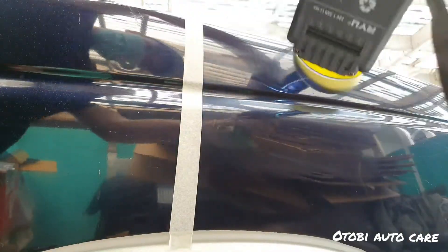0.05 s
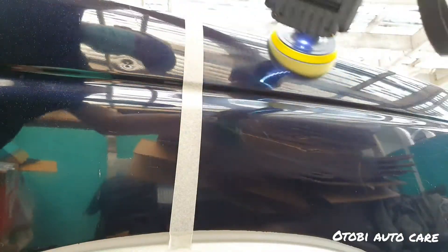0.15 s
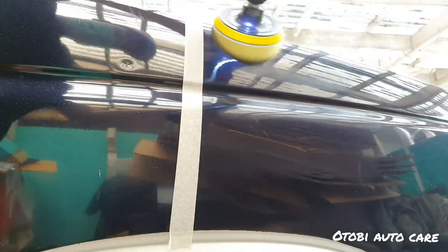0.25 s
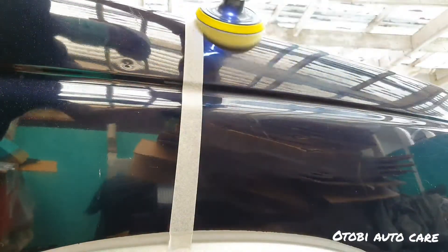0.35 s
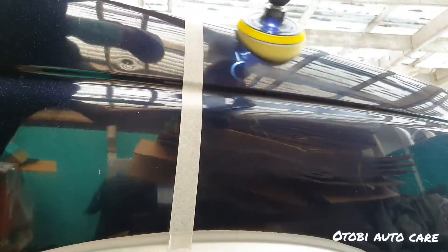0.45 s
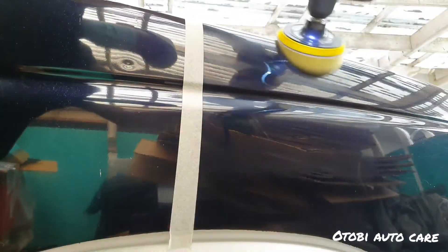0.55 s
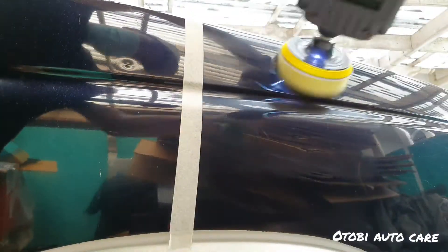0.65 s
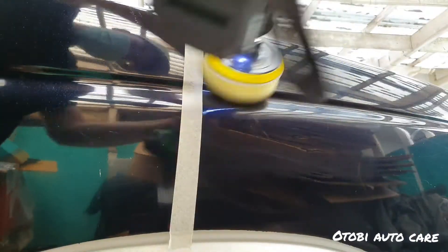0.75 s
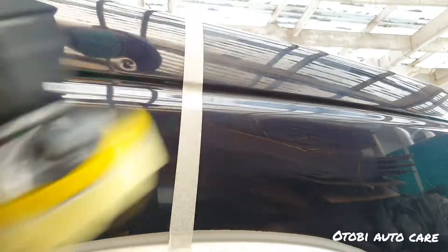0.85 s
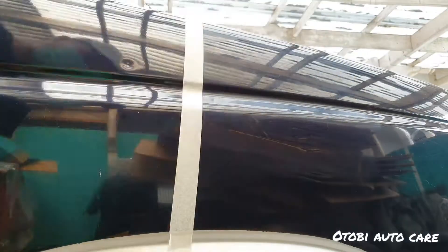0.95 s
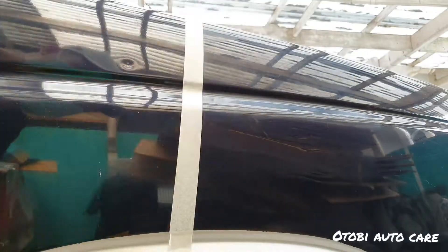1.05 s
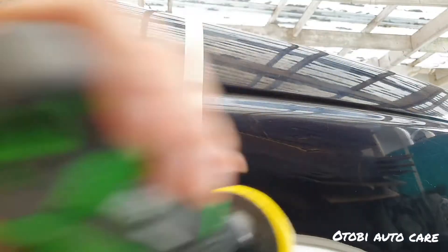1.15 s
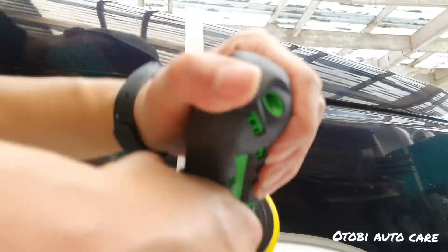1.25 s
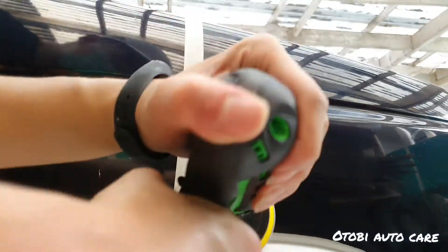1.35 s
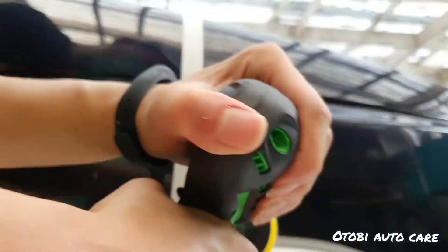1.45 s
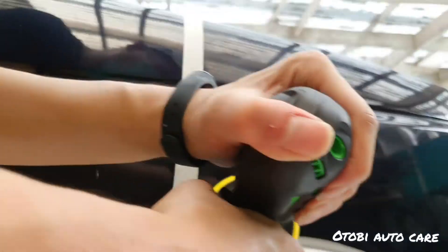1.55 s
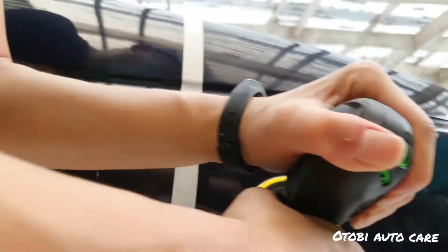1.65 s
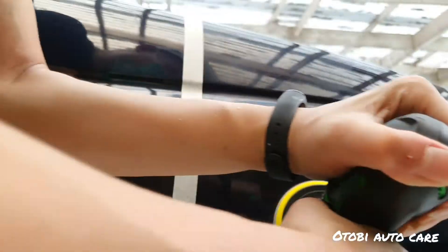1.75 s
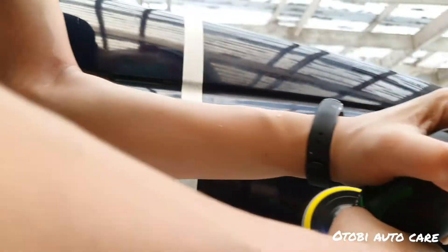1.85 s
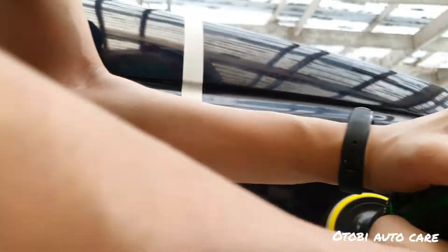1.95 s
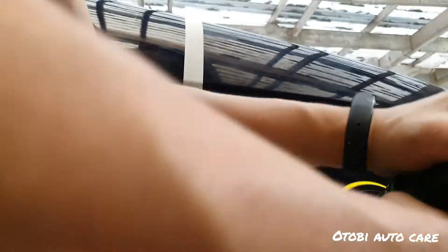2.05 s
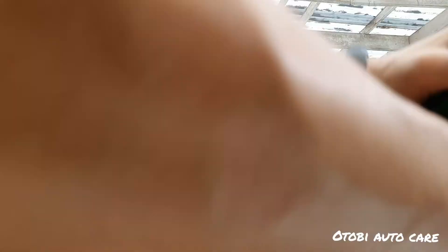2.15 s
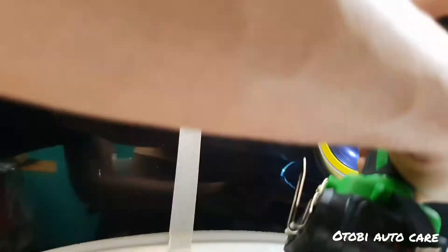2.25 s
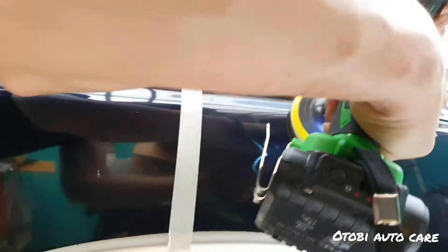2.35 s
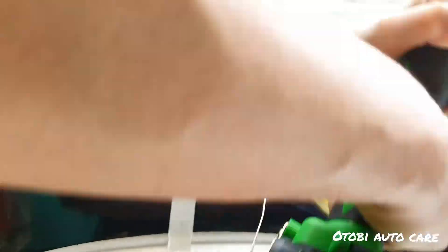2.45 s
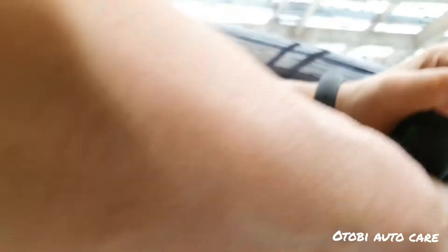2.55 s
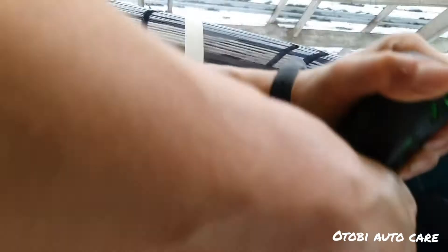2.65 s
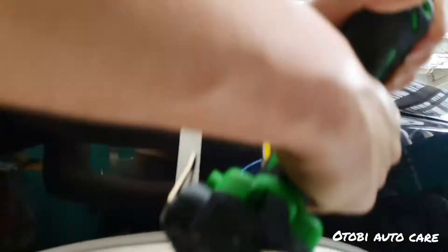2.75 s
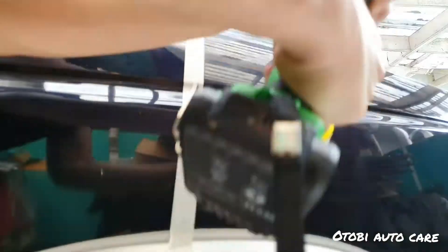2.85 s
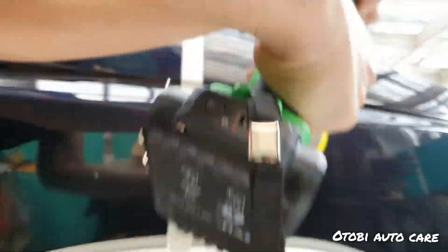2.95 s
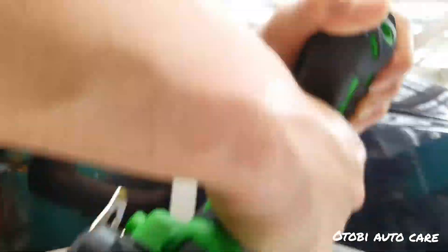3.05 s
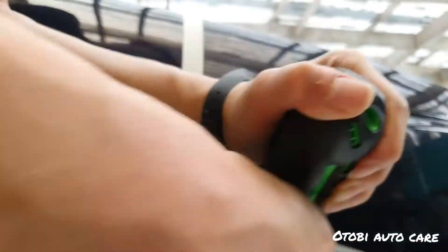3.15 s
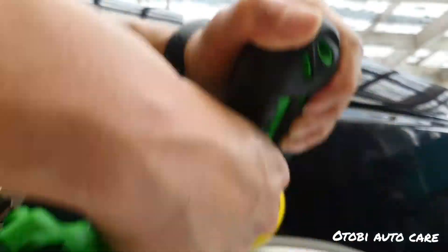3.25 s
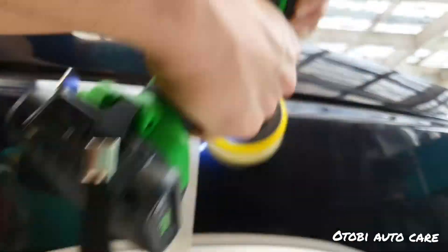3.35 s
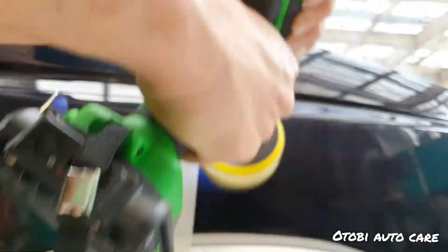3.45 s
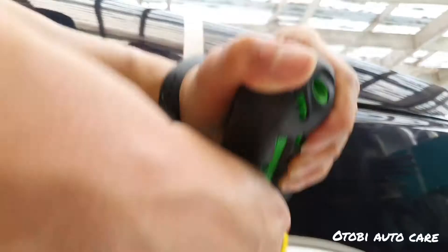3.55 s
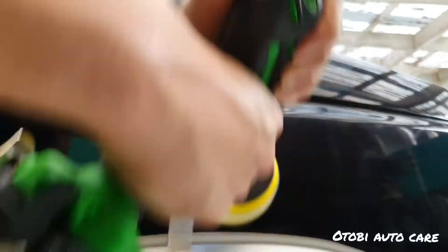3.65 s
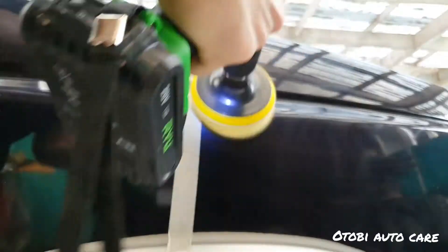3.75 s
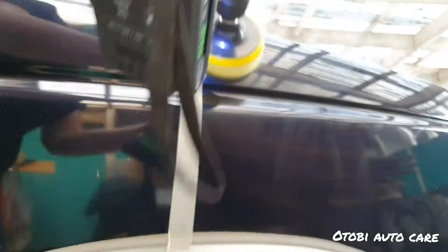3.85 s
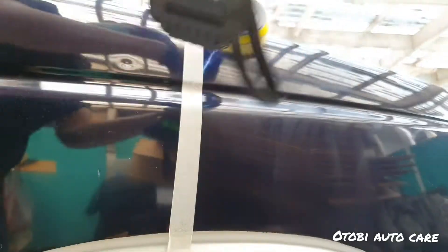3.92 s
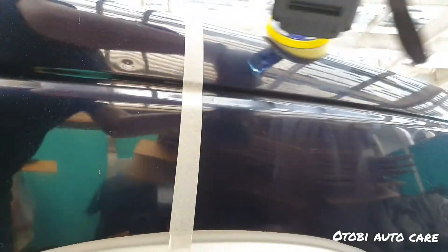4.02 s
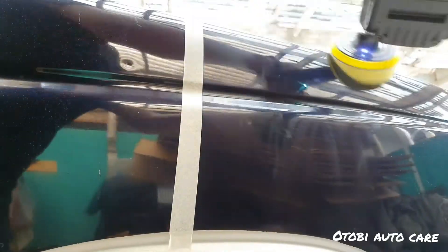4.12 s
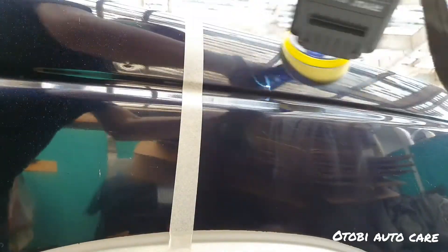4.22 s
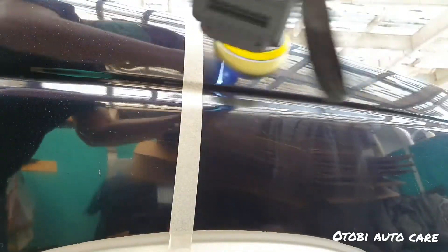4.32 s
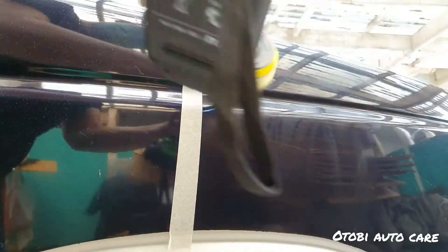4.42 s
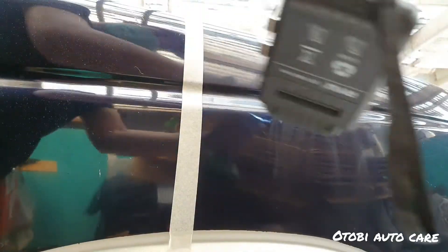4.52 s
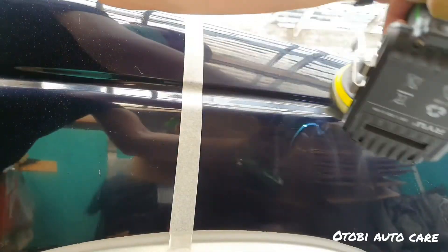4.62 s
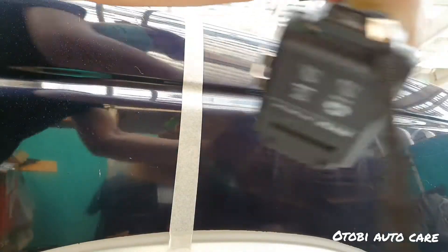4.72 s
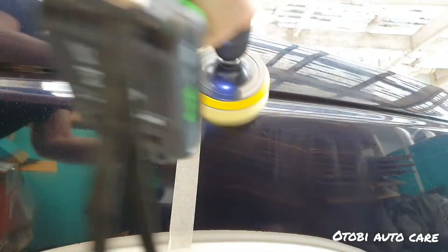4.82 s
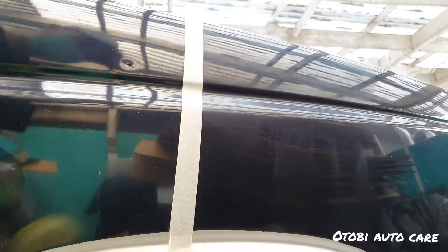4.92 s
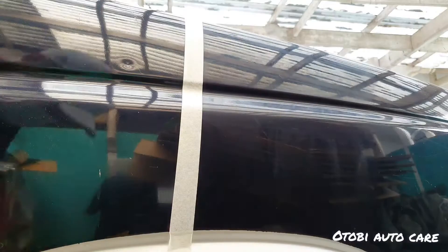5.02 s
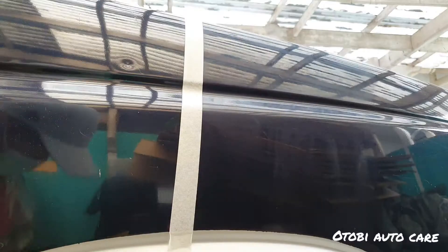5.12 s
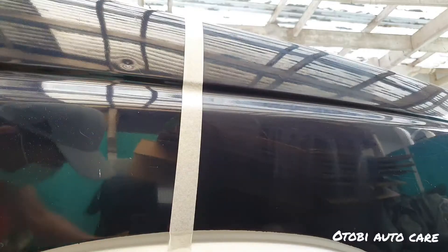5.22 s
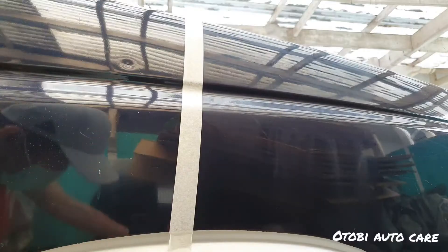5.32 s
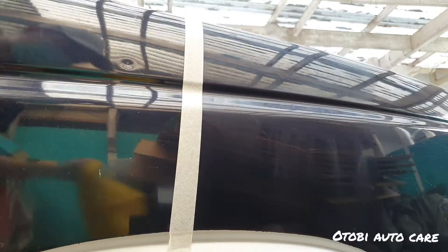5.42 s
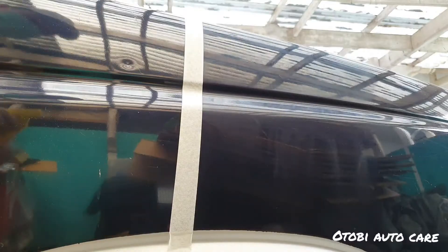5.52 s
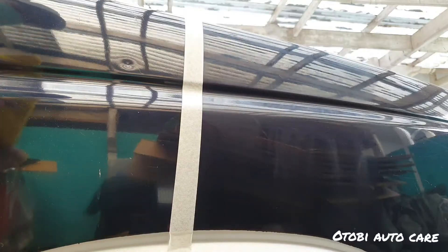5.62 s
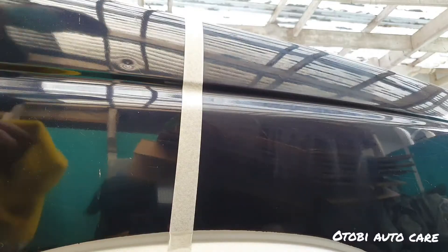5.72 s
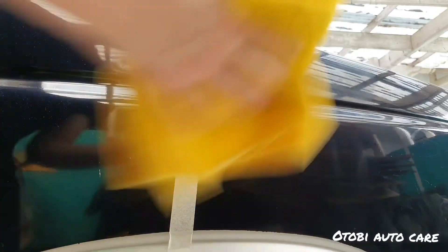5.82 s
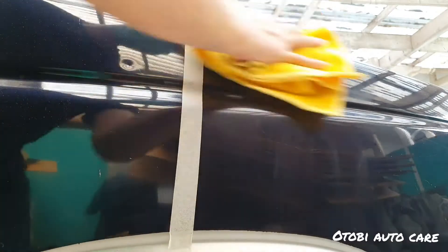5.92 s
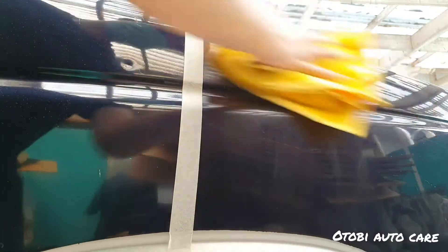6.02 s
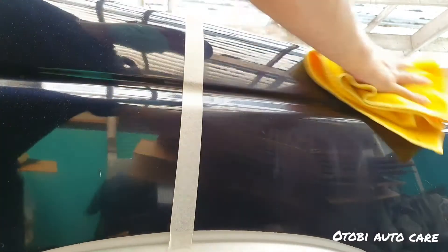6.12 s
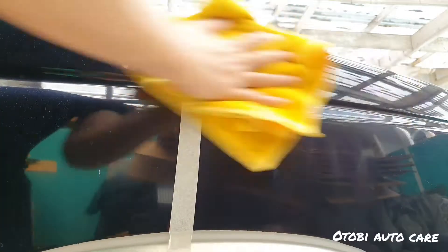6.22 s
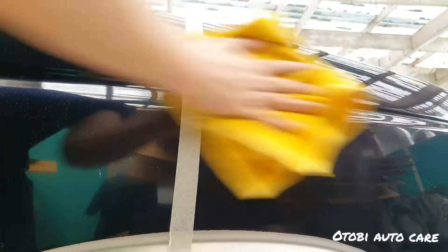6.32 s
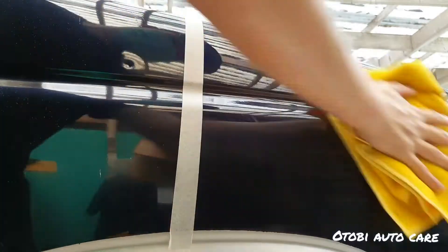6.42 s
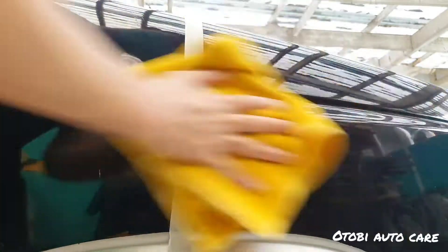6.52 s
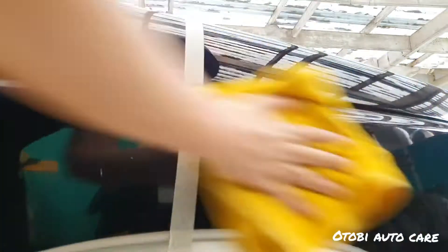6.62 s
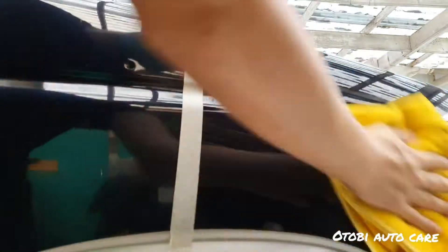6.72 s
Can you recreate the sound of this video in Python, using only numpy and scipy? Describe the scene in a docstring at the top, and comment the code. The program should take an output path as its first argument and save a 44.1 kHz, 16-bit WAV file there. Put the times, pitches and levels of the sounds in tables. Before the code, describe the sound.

From 0 s a cordless drill is already spinning close to the microphone: a piercing gear whine around 2.6 kHz, low motor hum and dry rattling teeth, slightly wavering. It stumbles near 0.6 s and stops abruptly at about 0.77 s. The gap holds low rumble and a faint rub. At 1.2 s a click and panel bump bring it back, with overlapping short squeals and chirps until 1.5 s. From 1.5 to 3.8 s pressure makes it raspier, hissing and hoarse, pitch sagging and recovering, while the car panel booms and judders softly. It runs freer and lighter from 3.9 s, stumbles near 4.4 s, and halts at 4.8 s with a sharp knock. Another hard tap comes at 5.2 s. Until 6.8 s, faint brief cloth strokes, small squeaks and ticks sit over low rumble and thin workshop air, nearly without echo.

```python
"""Drill-driven foam pad on a car panel

A cordless drill, already running, spins the pad in a workshop: one short run, a pause, then a long one.
Rotor orders hum; planetary gear teeth whine and rattle, with short squeals and gliding tones.
Load raises the rasp; the panel drums as noise and booms when bumped. Then a knock puts the drill aside,
and cloth noise wipes the paint over a low rumble and faint air."""
import sys
import numpy as np
from scipy import signal
from scipy.fft import rfft, irfft, next_fast_len
from scipy.io import wavfile

SR = 44100
rng = np.random.default_rng(int(sys.argv[2]) if len(sys.argv) > 2 else 0)


def materialize(psi):
    """Save the field psi as 16-bit PCM at rate SR to the path in sys.argv[1].

    A 1-D psi becomes a single channel; in a 2-D psi each row is a channel.
    """
    bounded = np.clip(np.atleast_2d(psi).T, -1, 1)
    quanta = np.round(bounded * 32767).astype(np.int16)
    wavfile.write(sys.argv[1], SR, quanta)


N = 298557
TIME = np.arange(N) / SR

# Low rumble. Each row: time in seconds, level in dB before trim.
RUMBLE_DB = [(0, -55.5), (.83, -53), (.95, -42), (1.25, -52), (4.8, -49), (5.15, -41), (5.55, -43),
             (5.9, -48.5), (6.77, -48.5)]
# Its spectrum. Each row: frequency in Hz, relative density in dB.
RUMBLE_COLOUR_DB = [(22, -13), (32, -4.5), (42, 1.5), (55, -11.5), (72, -0.5)]
# Workshop air spectrum. Each row: frequency in Hz, relative density in dB.
AIR_COLOUR_DB = [(200, -25), (280, -16), (400, -13.5), (650, -19), (780, -27), (2040, -30.5), (5000, -43.5),
                 (7600, -41.5), (8400, -49), (15800, -46.5)]
# Faint workshop tone. Each row: frequency in Hz, level in dB.
ROOM_TONES = [(646, -71.5)]
# Panel drumming between bumps. Each row: time in seconds, level in dB before trim.
PANEL_DB = [(0, -49), (.5, -47), (1.1, -38), (1.55, -50.5), (2, -37.5), (3, -42), (3.65, -47), (3.85, -40),
            (4.8, -54.5), (5.3, -51.5), (6.77, -52)]
# Its spectrum. Each row: frequency in Hz, relative density in dB.
PANEL_COLOUR_DB = [(70, -2.5), (95, -3.5), (125, -1), (175, -2), (225, -4)]
# Bumps on the door panel. Each row: time in seconds, level in dB.
BUMPS = [(1.165, -30.5), (1.27, -40.5), (1.34, -38.5), (2.05, -38), (2.13, -36), (2.3, -34), (2.47, -34),
         (2.849, -36.5), (3.17, -39.5), (3.35, -36.5), (3.48, -38.5), (3.714, -30.5), (4.02, -38),
         (4.62, -37.5), (4.78, -38)]
# Judders as the foam grips. Each row: middle in seconds, half length in seconds, level in dB, pitch in Hz.
JUDDERS = [(1.72, 0.15, -38.5, 67.5), (1.97, 0.14, -34.5, 57), (2.535, 0.059, -33, 53.3),
           (3.094, 0.1, -37.5, 53), (3.58, 0.043, -35.5, 60)]
# Cloth strokes. Each row: middle in seconds, half length in seconds, level in dB, brightness in dB.
WIPES = [(1.059, 0.013, -59.5, 2), (4.92, 0.025, -66, -2.5), (5.062, 0.013, -63, 3),
         (5.288, 0.01, -53.5, 3), (5.341, 0.015, -56.5, 18), (5.453, 0.01, -54.5, 0),
         (5.53, 0.039, -63.5, -1), (5.712, 0.021, -64, 2), (5.806, 0.0075, -59.5, 1),
         (5.875, 0.0077, -65, 6), (6.02, 0.018, -65, -7), (6.17, 0.027, -67, -2), (6.331, 0.013, -62, -4),
         (6.475, 0.029, -64.5, 0), (6.55, 0.011, -69, 19), (6.611, 0.014, -55, 2)]
# Cloth on paint. Each row: frequency in Hz, relative density in dB.
CLOTH_COLOUR_DB = [(300, 7), (900, -1), (2000, -3), (3500, -10), (6000, -11), (9000, -19.5), (12500, -14),
                   (15500, -21)]
# Squeaks of rubbed paint. Each row: middle in seconds, half length in seconds, level in dB,
# pitch in Hz, width in Hz.
SQUEAKS = [(5.012, .006, -63, 2700, 250), (5.456, .008, -57, 1930, 260), (5.6, 0.012, -71.5, 7690, 90),
           (5.71, 0.011, -73, 7690, 90), (5.76, 0.014, -70, 7690, 90), (5.947, .004, -62, 2130, 200),
           (6.612, .012, -56, 2100, 500)]
# Knocks and ticks of the handled tool. Each row: time in seconds, level in dB before trim,
# body ring factor 0-1.
KNOCKS = [(1.202, -26.5, 0.05), (4.801, -22.5, 0.22), (4.98, -51.5, 0.8), (5.014, -55, 0.97),
          (5.194, -29.5, 0.92), (5.202, -41, 0.55), (5.207, -47, .4), (5.446, -46, 0.1), (5.944, -62, 0.99),
          (6.714, -44.5, 0.02)]
# Tool body modes. Each row: frequency in Hz, relative level in dB, t60 in seconds.
TOOL_MODES = [(447, 5.5, 0.043), (795, -5, 0.025), (1005, -8, 0.037), (1576, -6, 0.029), (1960, -6, .033),
              (2780, -5, 0.03), (2940, -9, .022), (3370, -8, 0.022), (4450, -15, .025), (5260, -19, 0.025)]
# Trigger. Each row: on in seconds, off in seconds.
RUNS = [(-1.1, .771), (1.2, 4.813)]
# Motor speed before stumbles and jitter. Each row: time in seconds, gear tooth rate in Hz.
TOOTH_RATE_HZ = [(0, 2647), (.08, 2663), (.2, 2604), (.32, 2657), (.49, 2627), (.6, 2617), (.68, 2537),
                 (.775, 2525), (1.22, 2475), (1.55, 2584), (1.65, 2575), (1.75, 2602), (1.92, 2580),
                 (2.08, 2650), (2.25, 2678), (2.38, 2614), (2.54, 2586), (2.87, 2647), (2.98, 2510),
                 (3.22, 2543), (3.36, 2658), (3.46, 2529), (3.56, 2500), (3.72, 2623), (3.81, 2524),
                 (3.87, 2604), (3.99, 2553), (4.2, 2622), (4.35, 2578), (4.41, 2489), (4.55, 2524),
                 (4.8, 2488)]
# Pad pressure on the paint. Each row: time in seconds, load 0-1.
PAD_LOAD = [(0, 0.33), (.37, 0.12), (.65, 0.25), (.76, 0.14), (1.22, 0.17), (1.5, 0.77), (1.83, 0.77),
            (2.07, 0.67), (2.38, 0.53), (2.56, 0.74), (2.84, 0.46), (3.17, 0.72), (3.38, 0.5), (3.55, 0.64),
            (3.92, 0.12), (4.3, 0.15), (4.8, 0.13)]
# Motor stumbles. Each row: middle in seconds, half length in seconds.
STUMBLES = [(0.632, 0.014), (4.382, 0.016)]
# Gear whine. Each row: time in seconds, level in dB before trim and dips.
WHINE_DB = [(0, -24.5), (.04, -25), (.08, -39), (.12, -26), (.21, -24), (.29, -28.5), (.36, -27.5),
            (.49, -23), (.6, -29.5), (.66, -41), (.715, -20.5), (.75, -22.5), (.77, -43.5), (1.22, -50),
            (1.4, -48), (1.44, -35), (1.56, -39), (1.64, -31.5), (1.82, -29), (2.02, -41), (2.21, -30),
            (2.29, -32.5), (2.36, -24.5), (2.45, -33), (2.52, -23), (2.6, -27), (2.68, -25), (2.77, -32),
            (2.98, -28.5), (3.24, -36), (3.33, -31.5), (3.56, -32.5), (3.64, -35), (3.74, -32), (3.82, -34),
            (3.95, -30), (4.13, -26.5), (4.2, -28), (4.27, -29), (4.35, -29), (4.41, -42), (4.45, -40),
            (4.53, -32.5), (4.62, -36), (4.68, -33), (4.72, -42), (4.8, -39)]
# Whine beam as the drill turns. Each row: time in seconds, left-right difference in dB,
# left phase lead in radians.
WHINE_BEAM = [(0, 12, -2.5), (.25, 1, 0.34), (.7, -1, 1.2), (1.35, 1.5, 1.5), (1.6, 2, -1), (1.8, 5.5, 0.5),
              (1.96, -2.5, -9.5), (2.1, 15, -2.5), (2.26, -3, -2.5), (2.36, 13, -2.5), (2.52, 12, -3.5),
              (2.68, 6.5, -1.5), (2.86, 5.5, 1.2), (3.14, 5, -4.5), (3.26, 2.5, 0), (3.42, 5, 1),
              (3.6, 3, 0.2), (3.9, 7, 0.5), (4.16, -2, -2.5), (4.35, 12, 1.5), (4.52, 0, 0), (4.76, 13, -4)]
# Hum orders. Each row: rotor order, left-right difference in dB, phase smear at full load in radians.
HUM_ORDERS = [(1, 3.5, 2.07), (2, -2, .45), (3, -0.5, .5)]
# Hum. Each row: time in seconds, then level of orders 1, 2 and 3 in dB before trim and dips.
HUM_DB = [(0, -42, -43.5, -49), (.35, -44, -44, -49), (.72, -39.5, -46, -48.5), (1.22, -64, -55, -54.5),
          (1.38, -58.5, -59.5, -52), (1.45, -51, -42, -40.5), (1.56, -37, -43, -38),
          (1.7, -45.5, -50, -38.5), (1.9, -47, -49, -40), (2.06, -48, -42, -49.5), (2.2, -46, -51, -56),
          (2.36, -42, -46, -53), (2.56, -42.5, -46, -40.5), (2.68, -47, -38, -44.5),
          (2.88, -39.5, -50, -61), (3.14, -50, -37, -37), (3.34, -40.5, -41.5, -53),
          (3.56, -50, -40.5, -38), (3.76, -44, -42.5, -63), (3.92, -41.5, -50, -48.5),
          (4.1, -40.5, -45, -45), (4.3, -41.5, -43, -49), (4.5, -41.5, -38, -64), (4.8, -42, -40.5, -72)]
# Gear noise spectrum. Each row: frequency in Hz, relative density in dB.
GEAR_COLOUR_DB = [(300, -5.5), (450, -1.5), (640, 0.5), (920, -6), (1080, 3.5), (1600, -2.5), (2300, -3.5),
                  (3150, 0), (3550, -3.5), (4100, -5), (4700, -2), (5600, -6), (6300, -4.5), (6650, -3),
                  (7750, -3), (9000, -9.5), (15800, -8.5)]
# Gear housing modes. Each row: frequency in Hz, width in Hz, peak gain on the rattle in dB.
HOUSING_MODES = [(1347, 55, -7), (1960, 260, 3), (5840, 290, 1.5), (10650, 250, -8.5)]
# Growl, rattle, rasp and hiss. Each row: level running free in dB, dB added at full load,
# dB added per 100 Hz of sag, dB lost just after the start.
GEAR_BANDS = [(-40.5, 5.5, 1.7, 1.5), (-32.5, 2.5, 1.36, 3), (-37, 14, 1.5, 2), (-38, 8.5, 1, 5.5)]
# Gear noise lean before the shared gear lean. Each row: frequency in Hz, left-right difference in dB.
GEAR_LEAN_DB = [(300, 6), (700, 0), (1290, 0.5), (2380, 4), (4400, -1), (8120, 1.5), (15000, -0.5)]
# Left-right likeness of all coloured noise. Each row: frequency in Hz, likeness 0-1.
LIKENESS = [(60, 0.97), (120, 1), (240, 0.86), (480, 0.71), (950, 0.62), (1890, 0.26), (3770, .06),
            (7500, 0), (15000, 0)]
# Gear case ring. Each row: time in seconds, level in dB, centre in Hz.
CASE_RING = [(0, -48, 1925), (.25, -38, 1956), (.6, -48.5, 1948), (1.5, -41.5, 2033), (1.72, -34, 2024),
             (1.83, -38, 2036), (1.98, -32, 2013), (2.12, -34.5, 1946), (2.35, -33.5, 1945),
             (2.6, -39.5, 1960), (3.1, -36, 1972), (4.3, -50.5, 1910), (4.45, -46, 1895),
             (4.55, -32.5, 1917), (4.7, -50, 1920), (4.8, -35, 1900)]
# Broader upper case ring. Each row: time in seconds, level in dB.
CLATTER_DB = [(0, -44), (.35, -34), (.55, -50), (.76, -37.5), (1.22, -54.5), (1.45, -46), (1.8, -41.5),
              (2.1, -43.5), (2.8, -44.5), (3, -32), (3.25, -33.5), (3.38, -36.5), (3.5, -32), (3.65, -32),
              (3.85, -41), (4.2, -52), (4.7, -56), (4.8, -33)]
# Hoarse spindle whistle. Each row: time in seconds, centre in Hz.
WHISTLE_HZ = [(0, 5540), (.76, 5430), (1.22, 5960), (1.4, 5660), (1.62, 5570), (1.8, 5430), (1.93, 5590),
              (2.07, 5896), (2.6, 5686), (3.34, 5795), (4.35, 5920), (4.6, 5620)]
# Thin tones of the circling planets. Each row: multiple of the planet pass rate,
# level running free in dB before trim, dB added at full load.
PLANET_TONES = [(7, -43.5, -6), (9, -50.5, 5), (10, -43.5, 3.5), (12, -48, 4), (13, -40, -5.5),
                (15, -38.5, -5.5), (21, -50.5, 12), (27, -48, 9.5), (28, -49, 7), (29, -47.5, 12.5),
                (30, -46.5, 18.5), (31, -47, 15), (32, -47, 10), (36, -40, -2), (42, -50.5, 5.5),
                (43, -55, 7)]
# Planet tones that sing out. Each row: start in seconds, length in seconds, multiple of the pass rate,
# level in dB, phase smear in radians.
SINGS = [(0, 0.59, 7, -40, 1.1), (0.423, 0.22, 29, -35.5, .6), (1.58, .36, 30, -33, 1.5),
         (1.54, .45, 31, -33, 1.1), (1.63, .36, 29, -29, 0.73), (1.75, .14, 29, -30, .25),
         (2.03, .14, 32, -33.5, 1.0), (2.491, .2, 30, -37.5, .8), (2.558, .1, 31, -35, 1.0),
         (3.16, .08, 32, -29.5, 1.11), (3.54, .21, 32, -32, 1.2), (4.517, .2, 36, -45, 0.98)]
# Short squeals and gliding tones of motor, gears and bearing. Each row: start in seconds,
# length in seconds, first pitch in Hz, last pitch in Hz, level in dB, chatter 0-1.
SQUEALS = [(0.585, 0.034, 3220, 3205, -36, 0), (0.63, 0.087, 3130, 3100, -34, 0.17),
           (0.753, 0.028, 2253, 2120, -29.5, 0.2), (1.21, .025, 3350, 3620, -34.5, 0.2),
           (1.24, 0.023, 3160, 3330, -35.5, .12), (1.216, 0.08, 5950, 6280, -30.5, 0.6),
           (1.24, 0.13, 5100, 4990, -33, 0.5), (1.282, .028, 3750, 3830, -33, .08),
           (1.28, .025, 2530, 2500, -41, .1), (1.306, .02, 3240, 3340, -30.5, .08),
           (1.331, .022, 3360, 3400, -28.5, .1), (1.353, 0.078, 3224, 3160, -26.5, .1),
           (1.357, 0.085, 4774, 4860, -29.5, .55), (1.44, 0.068, 5020, 5040, -28.5, .2),
           (2.222, 0.087, 6870, 7030, -35, 0.29), (2.294, .07, 5720, 5690, -33, 0.3),
           (3.316, 0.047, 5880, 5860, -26, 0.26), (4.352, 0.021, 2306, 2180, -34, 0.15),
           (4.389, .03, 2214, 2342, -37, .05), (4.421, 0.016, 3110, 3020, -32, .15),
           (4.472, 0.019, 2290, 2283, -28, .1), (4.746, .016, 3090, 2970, -35, .1)]

AIR_DB = -57.5
BUMP_RISE_S, BUMP_DECAY_S = 0.016, 0.097
SUN_TEETH, RING_TEETH, PLANETS = 12, 42, 3
THROBS_PER_CARRIER = 0.77  # throbs per turn of the planet carrier
USUAL_TOOTH_HZ = 2600
STUMBLE_DB, STUMBLE_SAG = -11, .13  # sag: share of speed lost
SETTLE_S = 0.11  # build-up after each start
SING_EDGE_S = .015
CLATTER_HZ = 2235
CUTOFF_HZ = 15950


def from_db(db):
    """Decibels to gain."""
    return 10 ** (np.asarray(db) / 20)


def rms_one(x):
    """Scale so that the mean of the channels has rms 1."""
    return x / np.sqrt(np.mean(np.atleast_2d(x).mean(axis=0) ** 2) + 1e-20)


def in_time(rows):
    """Each column of a curve, at every sample."""
    s, *columns = np.transpose(rows)
    return [np.interp(TIME, s, c) for c in columns]


def at_hz(points, hz):
    """Read a table on a log-frequency axis."""
    f, value = np.transpose(points)
    return np.interp(np.log(hz + 1), np.log(f), value)


def drift(rate_hz):
    """Low-passed chance with spread 1."""
    grid = np.linspace(0, TIME[-1], 2 ** 15)
    hz = np.fft.rfftfreq(len(grid), grid[1])
    spectrum = rfft(rng.standard_normal(len(grid)))
    slow = irfft(spectrum / (1 + (hz / rate_hz) ** 2))
    return np.interp(TIME, grid, rms_one(slow))


def complex_drift(rate_hz):
    """Random amplitude and phase: turns a carrier into a narrow noise band."""
    return drift(rate_hz) + 1j * drift(rate_hz)


def smear(radians, rate_hz):
    """Quick phase unrest, in turns: it widens a line into a hoarse band."""
    return radians * drift(rate_hz) / (2 * np.pi)


def swell(s, half_s):
    """A bell-shaped rise and fall around a moment."""
    return np.exp(-.5 * ((TIME - s) / half_s) ** 2)


def gate(s, length_s, edge_s):
    """Fade in, hold, fade out."""
    return (np.tanh((TIME - s) / edge_s) - np.tanh((TIME - s - length_s) / edge_s)) / 2


def pan(lean_db):
    """Left and right gains for a level difference."""
    return from_db(np.array([[.5], [-.5]]) * lean_db)


def cut(x, hz, kind, order=4):
    """Butterworth filter."""
    sos = signal.butter(order, np.clip(hz, 10, .45 * SR), kind, fs=SR, output="sos")
    return signal.sosfilt(sos, x + 1e-18)


def resonate(x, hz, width_hz):
    """One resonance with gain 1 on top."""
    r = np.exp(-np.pi * width_hz / SR)
    zeros = np.array([1, 0, -1]) * (1 - r * r) / 2
    poles = [1, -2 * r * np.cos(2 * np.pi * hz / SR), r * r]
    return signal.lfilter(zeros, poles, x + 1e-18)


def coloured(spectrum, drive=None):
    """Two unrelated drives (noise if none) become a coloured stereo pair, alike in the bass; rms 1."""
    if drive is None:
        drive = rng.standard_normal((2, N))
    size = next_fast_len(N + SR // 2, True)
    mid, side = rfft(drive, size)
    hz = np.fft.rfftfreq(size, 1 / SR)
    alike = np.clip(at_hz(LIKENESS, hz), 0, .99)
    pair = np.sqrt(1 + alike) * mid + np.sqrt(1 - alike) * side * [[1], [-1]]
    low_hz, high_hz = spectrum[0][0], spectrum[-1][0]
    skirts = 1 / np.sqrt((1 + (hz / high_hz) ** 12) * (1 + (low_hz / (hz + 1)) ** 8))
    gain = from_db(at_hz(spectrum, hz)) * skirts / np.sqrt(1 + alike)
    return rms_one(irfft(pair * gain, size)[:, :N])


def tone(turns, waver_db, waver_hz, spread, spread_hz=3.1):
    """A sine whose strength and phase waver at each ear; it dips more than it swells."""
    ears = []
    for _ in range(2):
        strength = from_db(waver_db * np.minimum(drift(waver_hz), 1))
        ears.append(strength * np.sin(2 * np.pi * turns + spread * drift(spread_hz)))
    return rms_one(np.array(ears))


def split(x, edges_hz):
    """Bands that add up to the whole, each leaning to its side, then set to rms 1."""
    size = next_fast_len(N, True)
    hz, spectrum = np.fft.rfftfreq(size, 1 / SR), rfft(x, size)
    spectrum = spectrum * pan(at_hz(GEAR_LEAN_DB, hz))
    below = [0] + [1 / (1 + (hz / edge) ** 20) for edge in edges_hz] + [1]
    return [rms_one(irfft(spectrum * (b - a), size)[:, :N]) for a, b in zip(below, below[1:])]


def workshop(x, t60_s=0.12, wet_db=-22):
    """A short, weak tail from the open-sided room."""
    t = TIME[:SR // 2]
    tail = rng.standard_normal((2, len(t))) * from_db(-60 * t / t60_s) * (t > .004)
    tail /= np.sqrt(np.sum(tail ** 2, axis=1, keepdims=True))
    return x + from_db(wet_db) * signal.fftconvolve(x, tail, axes=1)[:, :N]


def door_panel(panel_db=0.55):
    """The panel drums softly all along; each bump makes it boom and die away."""
    power = from_db(in_time(PANEL_DB)[0] + panel_db) ** 2
    for s, db in BUMPS:
        shape = np.exp(np.minimum((TIME - s) / BUMP_RISE_S, (s - TIME) / BUMP_DECAY_S))
        power = power + (from_db(db) * shape) ** 2
    return np.sqrt(power) * coloured(PANEL_COLOUR_DB)


def background(air_db=-2.0, rumble_db=3.5):
    """Panel drumming, low rumble, workshop air and a faint wavering tone."""
    rumble = from_db(in_time(RUMBLE_DB)[0] + rumble_db) * coloured(RUMBLE_COLOUR_DB)
    air = from_db(AIR_DB + air_db) * coloured(AIR_COLOUR_DB)
    tones = sum(from_db(db) * tone(hz * TIME, waver_db=6.0, waver_hz=6, spread=.5)
                for hz, db in ROOM_TONES)
    return (door_panel() + rumble + air + tones) * pan(-1.1)


def judder(width_hz=14):
    """The door booms low, as twice-resonated noise, while the foam grips."""
    out = 0
    for s, half_s, db, hz in JUDDERS:
        boom = resonate(resonate(rng.standard_normal(N), hz, width_hz), hz, width_hz)
        out = out + from_db(db) * swell(s, half_s) * rms_one(boom)
    return out


def cloth(grain_db=3.0, split_hz=3500):
    """Fibres catch and slip under each stroke; a tilt about the split sets its brightness."""
    rub = coloured(CLOTH_COLOUR_DB) * from_db(grain_db * drift(150))
    dull = cut(rub, split_hz, "low", order=1)
    out = 0
    for s, half_s, db, bright_db in WIPES:
        tilted = dull * from_db(-bright_db / 2) + (rub - dull) * from_db(bright_db / 2)
        out = out + from_db(db) * swell(s, half_s) * tilted
    return out


def squeak():
    """Rubbed paint squeaks: brief, unsteady tones from twice-resonated noise."""
    out = 0
    for s, half_s, db, hz, width_hz in SQUEAKS:
        ring = resonate(resonate(rng.standard_normal((2, N)), hz, width_hz), hz, width_hz)
        out = out + from_db(db) * swell(s, half_s) * rms_one(ring)
    return out


def knocks(crack_s=0.0036, crack_db=-3, ring_db=-4):
    """A short noise crack, and the tool's body rings in decaying modes."""
    cracks, blows = np.zeros(N), np.zeros(N)
    for s, db, body in KNOCKS:
        cracks += from_db(db) * (TIME >= s) * np.exp(-np.abs(TIME - s) / crack_s)
        blows[int(s * SR)] += from_db(db) * body
    t = TIME[:SR // 4]
    ring = sum(from_db(db - 60 * t / t60) * np.sin(2 * np.pi * hz * t) for hz, db, t60 in TOOL_MODES)
    crack = cut(cracks * coloured(CLOTH_COLOUR_DB), 9400, "low", order=2)
    body_ring = signal.fftconvolve(blows, ring)[:N]
    return from_db(crack_db) * crack + from_db(ring_db) * body_ring


def trigger(rise_s=0.0054, brake_s=0.0035, coast_s=.1, rundown_s=0.025, rundown_db=-22):
    """Drive and speed share: the motor starts at once and is braked on release; gears run down briefly."""
    drive, speed = 0, 0
    for on, off in RUNS:
        since_off = np.maximum(TIME - off, 0)
        powered = np.exp(-np.logaddexp(0, (on - TIME) / rise_s) - since_off / brake_s)
        drive = drive + powered + from_db(rundown_db) * gate(off, rundown_s, 0.0051)
        speed = np.maximum(speed, (TIME > on - .05) * np.exp(-since_off / coast_s))
    return drive, speed


def loaded(free_db, load_db, sag_db=0, start_db=0):
    """Gain that follows load and speed sag, and builds up after each start."""
    sag = (USUAL_TOOTH_HZ - in_time(TOOTH_RATE_HZ)[0]) / 100
    fresh = sum(swell(on, SETTLE_S) for on, off in RUNS)
    return from_db(free_db + load_db * in_time(PAD_LOAD)[0] + sag_db * sag - start_db * fresh)


def chop(planet_pass, chatter, unevenness=0.29):
    """Each passing planet chops a tone; unequal planets add side tones once per carrier turn."""
    out = 1
    for turns, depth in ((planet_pass, chatter), (planet_pass / PLANETS, chatter * unevenness)):
        depth = np.clip(depth, 0, .8)
        pulse = depth * np.exp(2j * np.pi * turns + .4j * drift(40))
        out = out * np.sqrt(1 - depth ** 2) / (1 - pulse)
    return out


def low_throb(throbs):
    """A low throb, unsteady in strength and phase, grows under load."""
    lurch = from_db(1.7 * drift(13)) * np.sin(2 * np.pi * throbs + 1.4 * drift(16.0))
    return loaded(free_db=-49.5, load_db=11, start_db=12.5) * rms_one(lurch)


def squeal(planet_pass, jitter_hz=22, edge_share=0.09, waver_db=1.5, spread_rad=0.73, hoarse_rad=2.0):
    """Short squeals and gliding tones of motor, gears and bearing, hoarser the more they chatter."""
    wander_hz = jitter_hz * drift(90)
    ears = np.array([from_db(waver_db * drift(50)) * np.exp(1j * spread_rad * drift(4.4))
                     for ear in range(2)])
    out = 0
    for s, length_s, first_hz, last_hz, db, chatter in SQUEALS:
        hz = np.interp(TIME, [s, s + length_s], [first_hz, last_hz]) + wander_hz
        turns = np.cumsum(hz) / SR + smear(hoarse_rad * chatter, rate_hz=110)
        song = np.real(ears * chop(planet_pass, chatter) * np.exp(2j * np.pi * turns))
        out = out + from_db(db) * gate(s, length_s, edge_share * length_s) * rms_one(song)
    return out


def planet_tones(planet_pass, tones_db=-2.6, sings_db=0):
    """Thin, restless lines ride on the motor speed; load shifts their balance and some sing out."""
    load = in_time(PAD_LOAD)[0]
    out = 0
    for k, free_db, load_db in PLANET_TONES:
        line = tone(round(k) * planet_pass, waver_db=9.5, waver_hz=31, spread=1.02, spread_hz=9)
        out = out + from_db(tones_db + free_db + load_db * load) * line
    for s, length_s, k, db, blur_rad in SINGS:
        turns = round(k) * planet_pass + smear(blur_rad, rate_hz=43)
        line = tone(turns, waver_db=5.5, waver_hz=44.9, spread=0.37)
        out = out + from_db(db + sings_db) * gate(s, length_s, SING_EDGE_S) * line
    return out


def whistle(planet_pass, width_hz=200, chatter=0.33):
    """A narrow, chattering hiss from the spindle, louder under load."""
    wave = np.exp(2j * np.pi * np.cumsum(in_time(WHISTLE_HZ)[0]) / SR)
    flutter = np.array([complex_drift(width_hz) for ear in range(2)])
    hiss = np.real(wave * chop(planet_pass, chatter) * flutter)
    return loaded(free_db=-48, load_db=22.0) * rms_one(hiss)


def case_ring(db, hz, width_hz):
    """The case rings in a narrow, restless band, partly shared by both ears."""
    flutter = np.array([complex_drift(width_hz) for path in range(3)])
    wave = np.exp(2j * np.pi * np.cumsum(hz + np.zeros(N)) / SR)
    return from_db(db) * rms_one(np.real((flutter[:2] + flutter[2]) * wave))


def gear_case():
    """A narrow ring that shifts with the grip, and a broader clatter above it."""
    clatter = case_ring(in_time(CLATTER_DB)[0], CLATTER_HZ, width_hz=230)
    return case_ring(*in_time(CASE_RING), width_hz=65) + clatter


def bounces(x, echo=0.19, nearest_s=0.001227, step_s=.0021, sway=.05, count=4):
    """Echoes off door and arms comb the sound; their paths change as the drill moves."""
    ears = []
    for ear in x:
        lags_s = [(nearest_s + k * step_s) * (1 + sway * drift(1.2)) for k in range(count)]
        ears.append(ear + echo * sum(np.interp(TIME - lag, TIME, ear) for lag in lags_s))
    return np.array(ears)


def gear_rattle(teeth, throbs, uneven_db=1.4, rub=0.1, throb_db=0.66, flutter_db=1.0, flicker_db=0.71):
    """Teeth strike unevenly amid sliding noise, harder in a slow, regular throb."""
    strikes = np.diff(np.floor(teeth), prepend=0) * from_db(uneven_db * rng.standard_normal(N))
    strikes = 0.25 * strikes * rng.choice([-1, 1], (2, N))
    force = from_db(throb_db * np.cos(2 * np.pi * throbs) + flutter_db * drift(62))
    noise = coloured(GEAR_COLOUR_DB, force * (strikes + rub * rng.standard_normal((2, N))))
    noise = noise + sum(from_db(db) * resonate(noise, hz, width_hz)
                        for hz, width_hz, db in HOUSING_MODES)
    bands = split(bounces(noise), [1500, 4200, 8000])
    return sum(loaded(*levels) * from_db(flicker_db * drift(24)) * band
               for levels, band in zip(GEAR_BANDS, bands))


def gear_whine(teeth, waver_db=2.0, waver_hz=30, load_smear_rad=0.76):
    """The tooth tone reaches each ear along its own path; it turns hoarse under load."""
    lean_db, lead_rad = in_time(WHINE_BEAM)
    teeth = teeth + smear(load_smear_rad * in_time(PAD_LOAD)[0], rate_hz=85)
    gains = pan(lean_db)
    ears = gains * np.sin(2 * np.pi * teeth + np.array([[.5], [-.5]]) * lead_rad)
    ears /= np.sqrt(np.mean(gains ** 2, axis=0) / 2)
    return ears * from_db(waver_db * drift(waver_hz))


def motor_hum(turns, hum_db=-0.3):
    """The rotor's first three orders, each with its own level curve; load blurs them."""
    load = in_time(PAD_LOAD)[0]
    out = 0
    for (k, lean_db, blur_rad), db in zip(HUM_ORDERS, in_time(HUM_DB)):
        order_turns = round(k) * turns + smear(blur_rad * load, rate_hz=22)
        line = tone(order_turns, waver_db=4.0, waver_hz=30, spread=0.65, spread_hz=7.6)
        out = out + from_db(db + hum_db) * pan(lean_db) * line
    return out


def drill(jitter=.0018, whine_db=-0.8, gears_lean_db=-1.5, hum_share=0.4):
    """One tooth rate sets rotor, carrier and throb; stumbles sag it and dip whine and hum."""
    drive, speed = trigger()
    stumble = sum(swell(s, half_s) for s, half_s in STUMBLES)
    speed = speed * (1 - STUMBLE_SAG * stumble + jitter * drift(35))
    teeth = np.cumsum(in_time(TOOTH_RATE_HZ)[0] * speed) / SR
    carrier = teeth / RING_TEETH
    rotor = carrier + teeth / SUN_TEETH
    planet_pass, throbs = PLANETS * carrier, THROBS_PER_CARRIER * carrier
    dip_db = STUMBLE_DB * stumble
    gears = gear_rattle(teeth, throbs) + whistle(planet_pass) + gear_case() + planet_tones(planet_pass)
    whine = from_db(in_time(WHINE_DB)[0] + whine_db + dip_db) * gear_whine(teeth)
    hum = from_db(hum_share * dip_db) * motor_hum(rotor)
    return drive * (gears * pan(gears_lean_db) + whine + hum + squeal(planet_pass) + low_throb(throbs))


def scene():
    """Drill, knocks, cloth and squeaks in the room, over the juddering door and the background."""
    return background() + judder() + workshop(cloth() + squeak() + knocks() + drill())


def record(dry):
    """A steep elliptic low-pass cuts the top."""
    sos = signal.ellip(12, .1, 80, CUTOFF_HZ, fs=SR, output="sos")
    return signal.sosfilt(sos, dry)


dry = scene()
out = record(dry)
materialize(out)
```